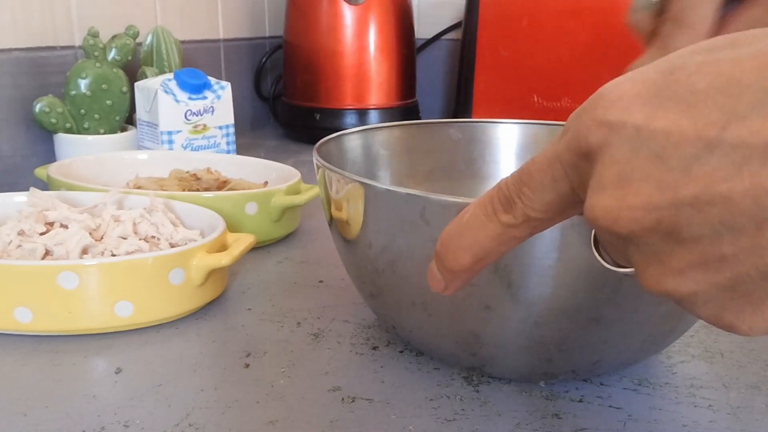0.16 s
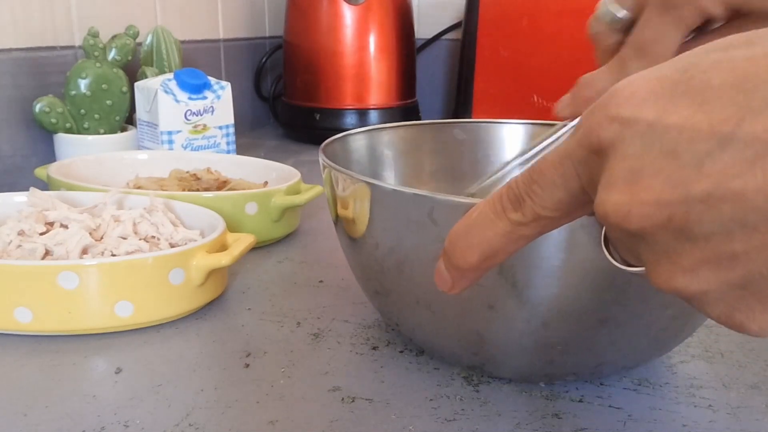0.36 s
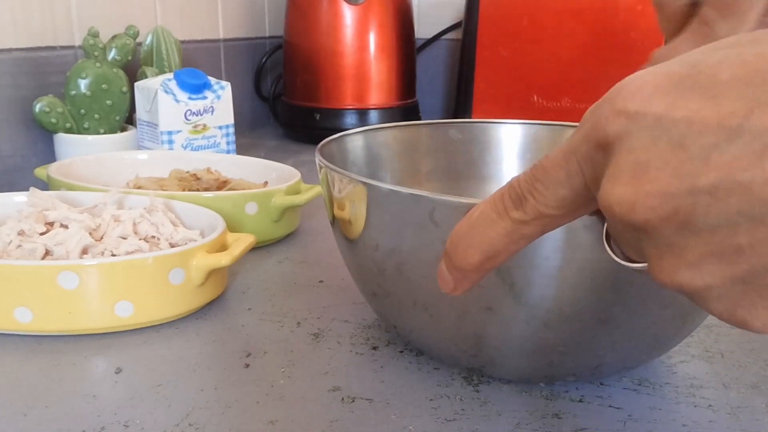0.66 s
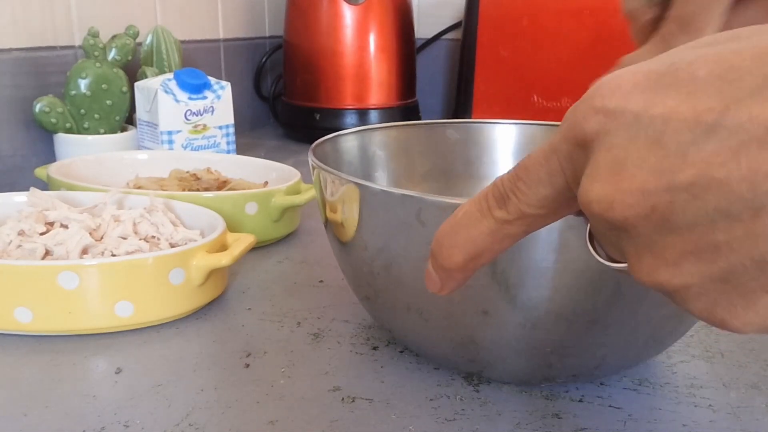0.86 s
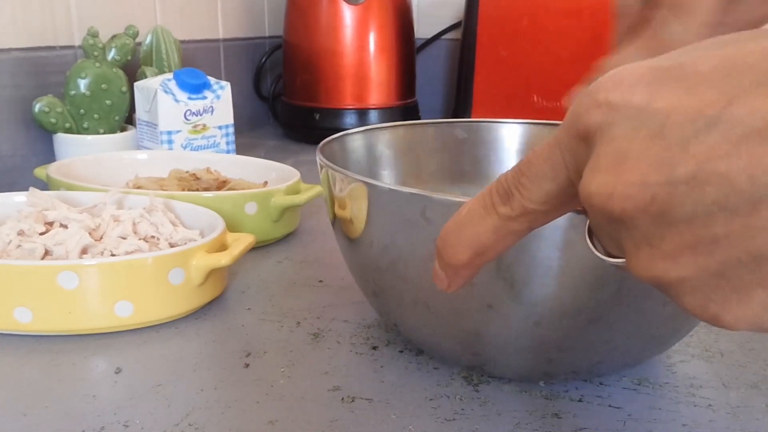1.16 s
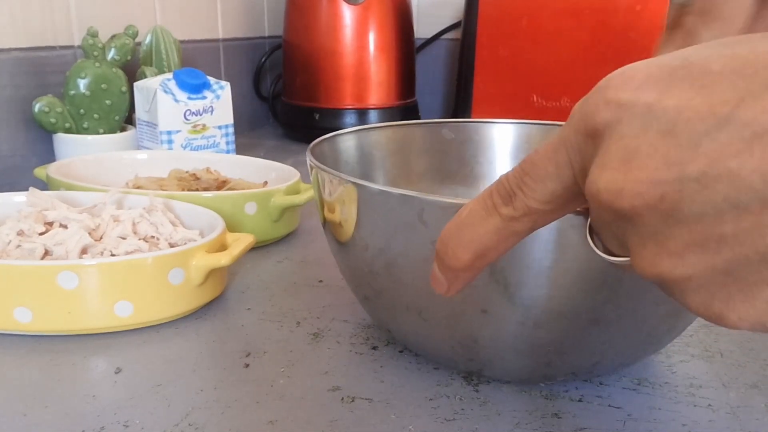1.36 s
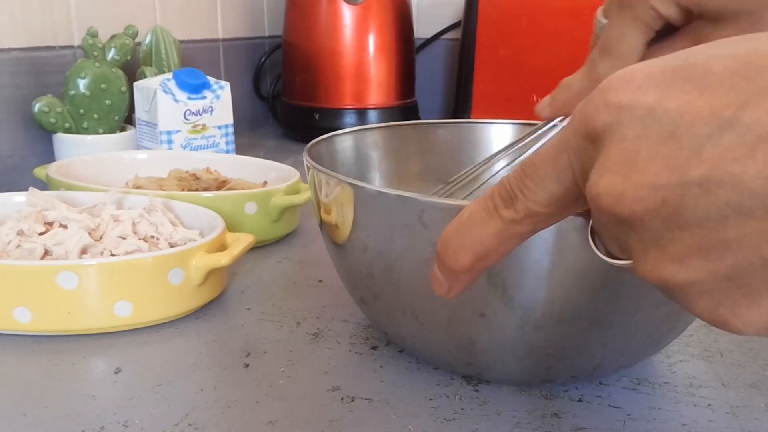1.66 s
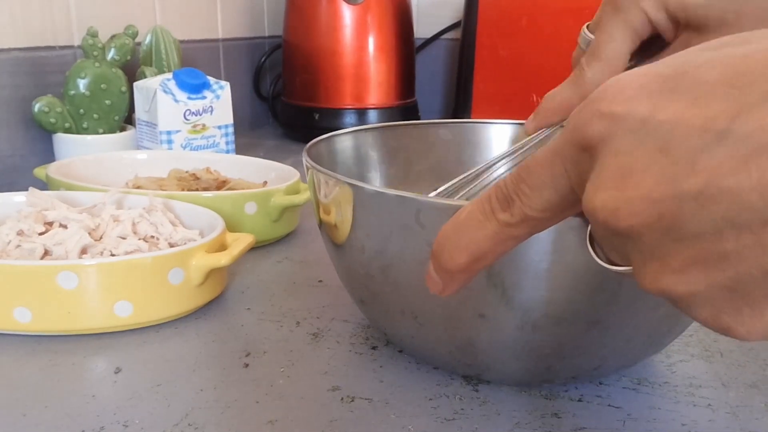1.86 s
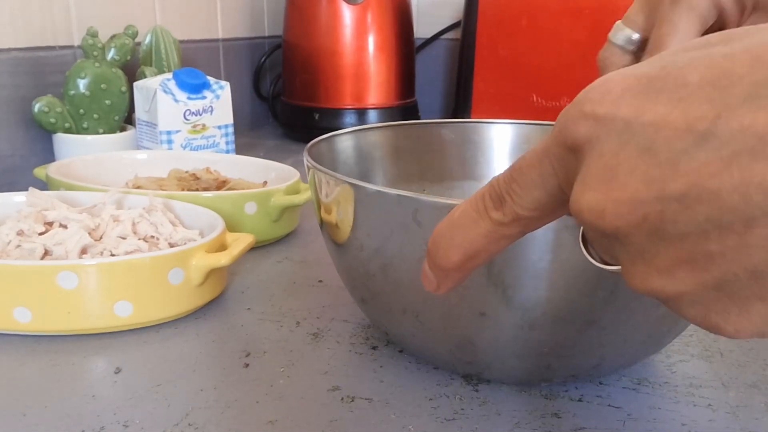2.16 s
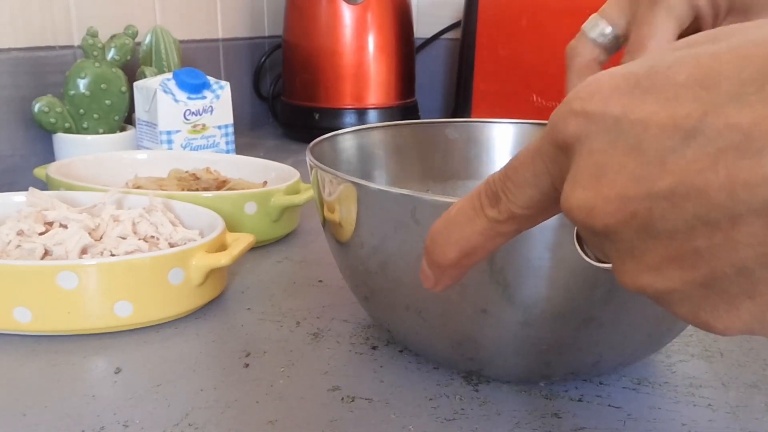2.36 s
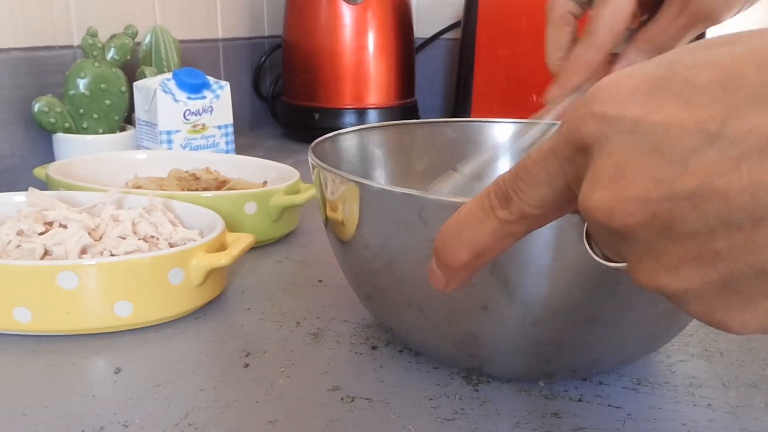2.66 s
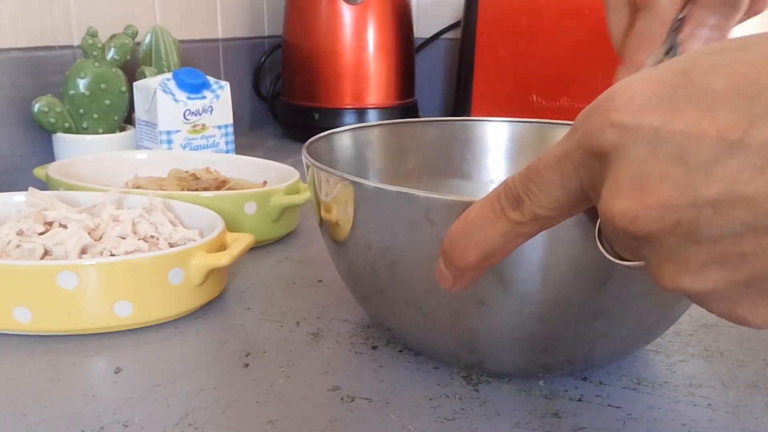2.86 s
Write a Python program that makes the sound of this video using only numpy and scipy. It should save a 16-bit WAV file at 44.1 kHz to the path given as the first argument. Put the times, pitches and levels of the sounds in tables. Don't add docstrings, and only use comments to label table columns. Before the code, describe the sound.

A wire whisk beats egg in a hand-damped steel bowl, close to the microphone: brisk rattling strokes, wet scrapes and small ticks, a lighter lull, then much harder metallic slams, in a quiet small kitchen.

```python
import sys
import numpy as np
from scipy import signal
from scipy.fft import rfft, irfft
from scipy.io import wavfile
from scipy.ndimage import uniform_filter1d

SR = 44100
rng = np.random.default_rng(int(sys.argv[2]) if len(sys.argv) > 2 else 0)


def transcribe(u):
    v = np.clip(np.atleast_2d(u).T, -1, 1)
    q = np.round(v * 32767).astype(np.int16)
    wavfile.write(sys.argv[1], SR, q)


def ratio(d):
    e = np.asarray(d, float) / 20
    return 10 ** e


N = 132300
T = np.arange(N) / SR

# start_s, peak_db, brightest_hz, thud_below_db, rattle_s
STRIKES = [(0.245, -14.5, 7220, -14, 0.0038), (0.249, -11.5, 5000, -22, 0.0046),
           (0.4935, -14.5, 4770, -24, 0.0038), (0.738, -13, 6630, -11.5, 0.0081),
           (0.82, -19, 3520, -8, 0.007), (0.955, -12, 4780, -14, 0.0097),
           (1.1775, -10.5, 5200, -28, 0.0034), (1.18, -10, 4630, -16, 0.0065),
           (1.265, -24.5, 3450, 0, 0.014), (1.399, -9, 5930, -13, 0.003), (1.62, -13, 4890, -12.5, 0.012),
           (1.816, -17, 5170, -9.5, 0.0038), (2.3594, -11, 2740, -0.5, 0.0165),
           (2.562, -14.5, 2900, -3, 0.0047)]
# start_s, peak_db, brightest_hz, thud_below_db, rattle_s
SLAMS = [
    (2.338, -4.5, 6660, -22.5, 0.0019),
    (2.545, -10.5, 8600, -16, 0.011),
    (2.739, 1.5, 7780, -18.5, 0.012),
    (2.958, 2.5, 5830, -26, 0.0092),
]
# start_s, level_db
WIRE_LANDINGS = [(2.3381, -8), (2.3395, -1), (2.3406, 0), (2.3418, -2), (2.5447, -2), (2.5475, -3),
                 (2.552, -4), (2.7382, -5), (2.7394, -4), (2.7423, -4), (2.7438, -5), (2.7449, 0),
                 (2.7485, -4), (2.7525, -7), (2.7565, -10), (2.9582, 0), (2.9608, -5), (2.963, 1),
                 (2.9652, -3), (2.9673, -5), (2.9695, -4), (2.9778, -12)]
# pitch_hz, level_db, t60_s
RIM_MODES = [(3030, -2, 0.024), (4270, -5, 0.01), (5533, -2.5, 0.018), (6200, -3, 0.016),
             (6883, 1.5, 0.012), (7550, -0.5, 0.013), (8300, -6, 0.013), (9540, 7.5, 0.0033)]
# start_s, peak_db, pitch_hz, thud_below_db, ring_t60_s
TICKS = [(0.057, -28.5, 2370, -46, 0.092), (0.112, -24.5, 4500, -45, 0.049), (0.139, -34, 2580, -45, 0.073),
         (0.362, -33, 2380, -11, 0.054), (0.557, -18.5, 4630, -29, 0.049), (0.607, -24.5, 3620, -19, 0.084),
         (0.686, -38.5, 8160, -10, 0.014), (0.778, -16.5, 4620, -24, 0.018),
         (0.856, -18.5, 5460, -26, 0.045), (0.919, -25.5, 2750, -42, 0.041),
         (1.047, -24, 3120, -16.5, 0.027), (1.2396, -21, 5300, -32.5, 0.015),
         (1.255, -30.5, 8440, -30, 0.01), (1.301, -27.5, 2260, -27, 0.02), (1.323, -24.5, 4040, -32, 0.027),
         (1.451, -24.5, 5960, -11, 0.013), (1.771, -22, 5350, -43, 0.023), (1.838, -27, 2310, -17, 0.019),
         (1.88, -26, 2400, -16.5, 0.044), (1.9032, -20.5, 3450, -21, 0.012),
         (1.9447, -11.5, 3700, -66, 0.035), (1.945, -20, 4130, -34, 0.013),
         (1.954, -23.5, 2350, -17.5, 0.024), (1.995, -24, 3980, -30, 0.0155),
         (2.134, -24.5, 11300, -37, 0.0087), (2.133, -28.5, 3340, -29, 0.018),
         (2.14, -35, 7940, -23, 0.0098), (2.151, -43, 990, 2, 0.03), (2.225, -20, 6350, -31, 0.03),
         (2.254, -27, 4600, -23, 0.02), (2.278, -32.5, 7000, -33, 0.02), (2.269, -23, 4260, -42, 0.037),
         (2.672, -20.5, 5100, -29, 0.038), (2.869, -17.5, 7820, -52, 0.019), (2.872, -27, 2330, -48, 0.014)]
# start_s, length_s, level_db, brightest_hz
DRAGS = [(-.04, 0.21, -49.5, 4420), (0.022, 0.22, -43.5, 4970), (0.157, 0.33, -43, 4430),
         (0.303, 0.27, -47.5, 4400), (0.47, 0.043, -38, 5770), (0.479, 0.22, -44.5, 4300),
         (0.66, 0.16, -41, 5050), (0.757, 0.19, -44.5, 3850), (0.895, 0.14, -37.5, 4630),
         (1.014, 0.11, -40, 4280), (1.075, 0.24, -40, 3600), (1.228, 0.22, -43, 3620),
         (1.332, 0.19, -43.5, 5030), (1.426, 0.15, -38.5, 4030), (1.523, 0.26, -39, 4480),
         (1.653, 0.14, -43, 3870), (1.738, 0.22, -42.5, 4850), (1.873, 0.081, -44.5, 4220),
         (1.907, 0.21, -45.5, 3430), (2.072, 0.17, -53.5, 3930), (2.179, 0.095, -40, 6200),
         (2.255, 0.061, -46.5, 4800), (2.342, 0.047, -26, 5670), (2.367, 0.11, -35, 4650),
         (2.453, 0.068, -46, 3560), (2.511, 0.17, -38.5, 5000), (2.655, 0.064, -49, 4500),
         (2.713, 0.15, -32.5, 6100), (2.844, 0.073, -42.5, 4900), (2.939, 0.081, -31.5, 5030)]
# start_s, level_db, pitch_hz,
# length_s
GLINTS = [(0.06, -48, 6550, 0.042), (0.147, -42, 2470, 0.047), (0.357, -44, 8100, .02),
          (0.393, -42.5, 3200, 0.025), (1.497, -61, 349, 0.092), (2.176, -49.5, 2810, 0.091),
          (2.2, -49, 8500, 0.029), (2.343, -29.5, 6630, .022), (2.383, -47.5, 771, 0.078),
          (2.572, -45.5, 878, 0.074), (2.754, -47, 761, 0.082), (2.965, -25.5, 5560, .07)]
# start_s, peak_db, pitch_hz
KNOCKS = [(0.24, -36, 670), (0.486, -32.5, 615), (0.731, -35, 465), (0.816, -32, 445), (0.953, -35, 302),
          (1.175, -39, 604), (1.395, -53, 570), (1.62, -28.5, 592), (1.814, -36.5, 490), (1.91, -38.5, 274),
          (2.148, -37.5, 543), (2.361, -25, 487), (2.564, -24.5, 503)]
# pitch_hz, level_db, t60_s
BOWL_MODES = [(2235, -12, 1.7), (2510, -23, 0.78), (2980, 19, 1.1), (4360, -15, 0.19), (5000, -19, 0.3),
              (5960, -38, 0.3), (6940, 28, 0.16), (7560, 27, 0.066), (8030, -8, 0.061), (8600, 30, 0.26)]
# pitch_hz, level_db, t60_s
BELLY_MODES = [(290, -4, .08), (450, -4, .06), (775, -10, .18), (880, -9, .08), (1150, -2, .04),
               (1500, -1, .05), (2050, -3, .04)]
# frequency_hz, level_db (per Hz)
KITCHEN_AIR = [(18, -68), (30, -17), (486, -1), (666, -12), (844, 1.5), (6050, -5.5), (8740, -39),
               (14000, -24), (16000, -38)]
# frequency_hz, level_db
MIC_RESPONSE = [(100, -4.5), (500, -1.5), (2000, 2.5), (5000, 3), (8500, 6.5), (11000, -4), (15000, -13.5)]
# frequency_hz, side_below_mid_db
PORT_DIFFERENCE = [(60, -20), (150, -36), (2200, -34), (4500, -16), (8000, -10), (13000, -3)]
# frequency_hz, level_db (per Hz)
MIC_HISS = [(20, 0), (80, -18), (300, -18), (3000, -30), (16000, -40)]

WIRE_HITS_PER_S, WIRE_SCATTER_DB = 3100, 5
STRIKE_DB, STRIKE_Q, FIRST_WIRE_DB = 1, 0.42, 13
WIRE_RING_DB, WIRE_RING_OCTAVES, WIRE_RING_T60_S = -4, 0.35, 0.018
SLAM_Q, SLAM_RING_DB, SLAM_FIRST_DB = 1.2, 3, 21
RIM_SPREAD_DB, RIM_FALL_DB_PER_OCTAVE = 2, 9
TICK_DB, TICK_Q, TICK_S = -6.5, 0.58, 0.0022
TICK_RING_DB, TICK_RING_Q = -1.5, 14
THUD_DB, THUD_S, THUD_HZ = -3.5, 0.013, 920
SLIPS_PER_S, SLIP_SCATTER_DB = 13000, 2.2
DRAG_Q, DRAG_FLUTTER_DB, DRAG_RISE, DRAG_FALL = 0.91, 1.1, 0.35, 0.6
PATCHY_DB, PATCHES_PER_S, SLOSH_DB = 4.5, 60, -26.5
BUBBLE_DB, BUBBLE_HZ, BUBBLE_OCTAVES, BUBBLE_CYCLES, BUBBLE_GLIDE = -9, 4600, 0.5, 16, 0.1
GLINT_Q = 20
KNOCK_DB, KNOCK_RISE_S, KNOCK_T60_S = -1, 0.0045, 0.07
KNOCK_BASS_DB, KNOCK_BASS_HZ = -19, 160
WALL_DB, WALL_T60_S, BOWL_DB, HAND_DAMPING = -8, 0.045, -23, 0.077
ROOM_DB, ROOM_T60_S, ROOM_HZ = -14, 0.3, 3000
KITCHEN_DB, AIR_FLUTTER_DB = -52.5, 1.5
HUM_HZ, HUM_DB, HUM_Q = 78, -79, 5
PORT_SPREAD_S, LEFT_DB, HISS_DB = 0.09, 0.8, -82
LOW_HZ, TOP_HZ = 85, 15500


def unit(x):
    return x / np.sqrt(np.mean(x ** 2))


def peak(x):
    return x / np.max(np.abs(x))


def band(x, hz, q):
    return signal.lfilter(*signal.iirpeak(min(hz, 0.4 * SR), max(q, 0.2), SR), x)


def band_twice(x, hz, q):
    return band(band(x, hz, q), hz, q)


def colour(x, table):
    hz, db = np.array(table, float).T
    f = np.fft.rfftfreq(N, 1 / SR) + 1
    return irfft(rfft(x) * ratio(np.interp(np.log(f), np.log(hz + 1), db)), N)


def rings(modes, damping):
    t = T[:SR // 3]
    h = np.zeros(len(t))
    for hz, db, t60 in modes:
        h += ratio(db) * np.sin(2 * np.pi * hz * t) * 1000. ** (-t / (min(t60, 0.5) * damping))
    return h / np.sqrt(np.sum(h ** 2))


def tail(t60):
    h = rng.standard_normal(SR // 3) * 1000. ** (-T[:SR // 3] / t60)
    return h / np.sqrt(np.sum(h ** 2))


def through(x, h):
    return signal.fftconvolve(x, h)[:N]


def clicks(rate, scatter_db):
    chance, size, sign = rng.random((3, N))
    strength = ratio(-scatter_db * np.log(size + 0.0033))
    return unit((chance < rate / SR) * strength * (sign - 0.5))


def walk(rate):
    k = int(SR / rate)
    return unit(uniform_filter1d(uniform_filter1d(rng.standard_normal(N), k), k))


def cut(x, start, t):
    return np.resize(x[int(start * SR):], len(t))


def add(out, start, x):
    i = int(start * SR)
    out[i:i + len(x)] += x[:N - i]


def rattle(hits, notes, hz, q, ring_db):
    ringing = band(through(hits, notes)[:len(hits)], hz, 0.6)
    return peak(band_twice(hits, hz, q) + ratio(ring_db) * ringing)


def strikes():
    wires, soft = clicks(WIRE_HITS_PER_S, WIRE_SCATTER_DB), rng.standard_normal(N)
    bright, push = np.zeros(N), np.zeros(N)
    landings = np.zeros(N + SR // 8)
    for s, db in WIRE_LANDINGS:
        add(landings, s, ratio(db) * np.ones(1))
    t = T[:SR // 8]

    def strike(s, db, thud_db, sound):
        add(bright, s, ratio(db + STRIKE_DB) * sound)
        thud = cut(soft, s, t) * t / THUD_S * np.exp(-t / THUD_S * 2)
        add(push, s, ratio(db + thud_db + THUD_DB) * thud)

    def bunch(s, length):
        return cut(wires, s, t) * 2 / (1 + np.exp(t / length) ** 2)

    for s, db, hz, thud_db, length in STRIKES:
        hits = bunch(s, length) + ratio(FIRST_WIRE_DB) * (t == 0)
        place = 2 * (np.arange(10) + rng.random(10)) / 10 - 1
        modes = [(hz * 2 ** (WIRE_RING_OCTAVES * p), -8 * p ** 2, WIRE_RING_T60_S) for p in place]
        strike(s, db, thud_db, rattle(hits, rings(modes, 1.0), hz, STRIKE_Q, WIRE_RING_DB))

    for s, db, hz, thud_db, length in SLAMS:
        hits = bunch(s, length) + ratio(SLAM_FIRST_DB) * cut(landings, s, t)
        modes = []
        for f, g, t60 in RIM_MODES:
            uneven = RIM_SPREAD_DB * (2 * rng.random() - 1)
            fall = RIM_FALL_DB_PER_OCTAVE * abs(np.log2(f / hz))
            modes.append((f, g + uneven - fall, t60))
        strike(s, db, thud_db, rattle(hits, rings(modes, 0.66), hz, SLAM_Q, SLAM_RING_DB))
    return bright, push


def ticks():
    soft, bright, push = rng.standard_normal(N), np.zeros(N), np.zeros(N)
    t = T[:SR // 8]
    for s, db, hz, thud_db, t60 in TICKS:
        rub = cut(soft, s, t)
        snap = rub * np.exp(-t / TICK_S) + 7 * (t == 0)
        ping = peak(band(rub * 1000. ** (-t / t60) + snap, hz, TICK_RING_Q))
        tick = peak(band_twice(snap, hz, TICK_Q)) + ratio(TICK_RING_DB) * ping
        add(bright, s, ratio(db + TICK_DB) * tick)
        thud = cut(soft[::-1], s, t) * np.exp(-t / THUD_S * 2)
        add(push, s, ratio(db + thud_db + THUD_DB) * thud)
    return bright, push


def drags():
    slips = clicks(SLIPS_PER_S, SLIP_SCATTER_DB) * ratio(DRAG_FLUTTER_DB * walk(32))
    patchy = np.zeros(N)
    for hz in 1000 * 2 ** np.arange(0, 4, 0.25):
        patchy += band(slips, hz, 5) * ratio(PATCHY_DB * walk(PATCHES_PER_S))
    pops = bubbles()
    stir = rng.standard_normal(N) * ratio(5.0 * walk(48))
    scrape, slosh = np.zeros(N), np.zeros(N)
    for s, length, db, hz in DRAGS:
        u = (T - s) / length
        ramp = np.clip(np.minimum(u / DRAG_RISE, (1 - u) / DRAG_FALL), 0, 1)
        shape = ratio(db) * np.sin(np.pi / 2 * ramp) ** 2
        scrape += shape * (unit(band(patchy, hz, DRAG_Q)) + ratio(BUBBLE_DB) * pops)
        slosh += shape * ratio(SLOSH_DB) * stir
    return scrape, slosh


def bubbles(count=900):
    out = np.zeros(N)
    for s, pitch, size in rng.random((count, 3)):
        hz = BUBBLE_HZ * 2 ** (BUBBLE_OCTAVES * 4 * (pitch - 0.5))
        turn = T[:600] * hz
        glide = 1 + BUBBLE_GLIDE * turn / BUBBLE_CYCLES / 2
        pop = np.sin(2 * np.pi * turn * glide) * np.exp(-3 * turn / BUBBLE_CYCLES)
        add(out, s * T[-1], ratio(-4 * np.log(size + 0.05)) * pop)
    return unit(out)


def glints():
    out, t, rub = np.zeros(N), T[:SR // 10], rng.standard_normal(N)
    for s, db, hz, length in GLINTS:
        note = unit(band_twice(cut(rub, s, t), hz, GLINT_Q))
        add(out, s, ratio(db) * note * np.sin(np.pi * np.clip(t / length, 0, 1)))
    return out


def knocks():
    out, t = np.zeros(N), T[:SR // 5]
    shape = (1 - np.exp(-t / KNOCK_RISE_S)) * 1000. ** (-t / KNOCK_T60_S)
    bass = ratio(KNOCK_BASS_DB) * np.sin(2 * np.pi * KNOCK_BASS_HZ * t)
    for s, db, hz in KNOCKS:
        add(out, s, ratio(db + KNOCK_DB) * (np.sin(2 * np.pi * hz * t) + bass) * shape)
    return out


def steel_bowl():
    (strike, strike_push), (tick, tick_push) = strikes(), ticks()
    scrape, slosh = drags()
    touch = strike + tick + scrape + glints()
    wall = ratio(WALL_DB) * through(touch, tail(WALL_T60_S))
    ring = ratio(BOWL_DB) * through(touch, rings(BOWL_MODES, HAND_DAMPING))
    low = band_twice(strike_push + tick_push + slosh, THUD_HZ, 0.3)
    belly = 4.8 * low + 1.14 * through(low, rings(BELLY_MODES, 1))
    return touch + wall + ring + knocks() + belly


def room(bowl):
    return ratio(ROOM_DB) * through(band(bowl, ROOM_HZ, 0.17), tail(ROOM_T60_S))


def kitchen():
    drone = unit(band_twice(rng.standard_normal(N), HUM_HZ, HUM_Q))
    air = unit(colour(rng.standard_normal(N), KITCHEN_AIR)) * ratio(AIR_FLUTTER_DB * walk(16))
    return ratio(KITCHEN_DB) * air + ratio(HUM_DB) * drone


def two_ports(mid):
    side = colour(through(mid, tail(PORT_SPREAD_S)), PORT_DIFFERENCE)
    side = side + (ratio(LEFT_DB / 2) - 1) * band_twice(mid, 8000, 1)
    side = side + ratio(HISS_DB) * unit(colour(rng.standard_normal(N), MIC_HISS))
    return np.array([mid + side, mid - side])


def scene():
    bowl = steel_bowl()
    return two_ports(colour(bowl + room(bowl), MIC_RESPONSE) + kitchen())


def roll_off(x):
    return signal.sosfilt(signal.butter(12, 16510, fs=SR, output="sos"), x)


def record(dry):
    low_cut = signal.butter(2, LOW_HZ, "high", fs=SR, output="sos")
    high_cut = signal.ellip(8, 0.2, 60, TOP_HZ, fs=SR, output="sos")
    rounded = np.tanh(0.95 * dry) / 0.95
    heard = signal.sosfilt(np.vstack([low_cut, high_cut]), rounded) * 0.88
    return roll_off(heard)


dry = scene()
out = record(dry)
transcribe(out)
```